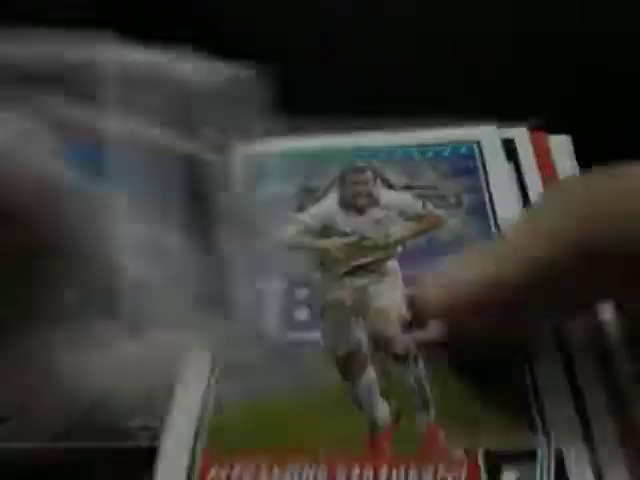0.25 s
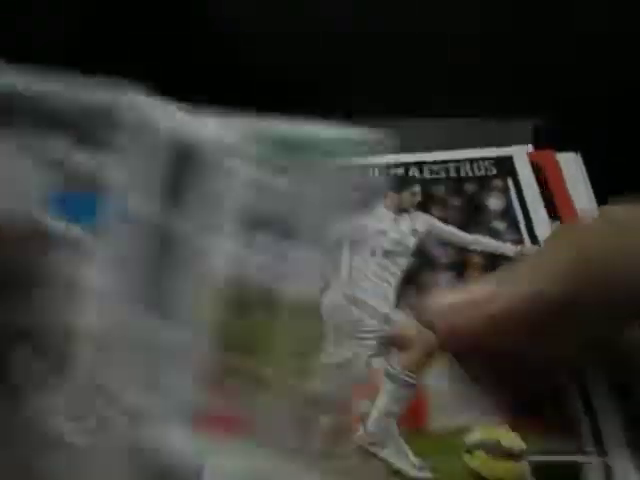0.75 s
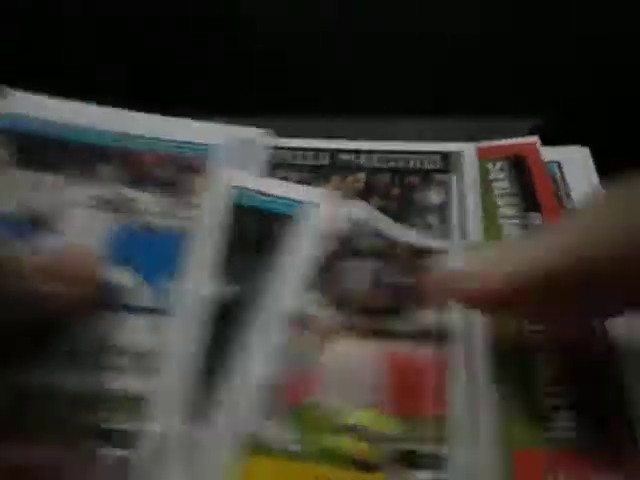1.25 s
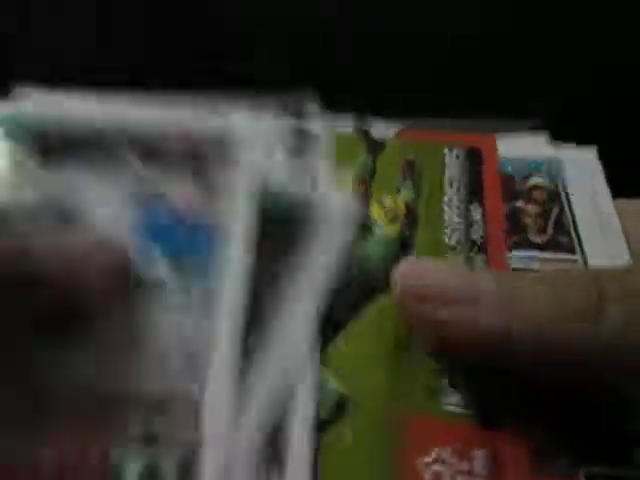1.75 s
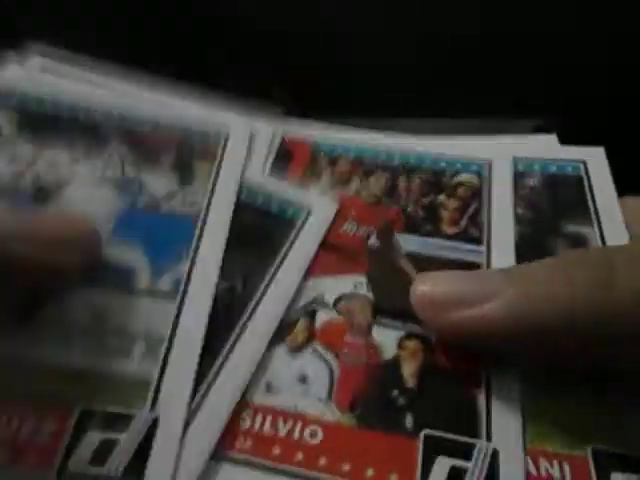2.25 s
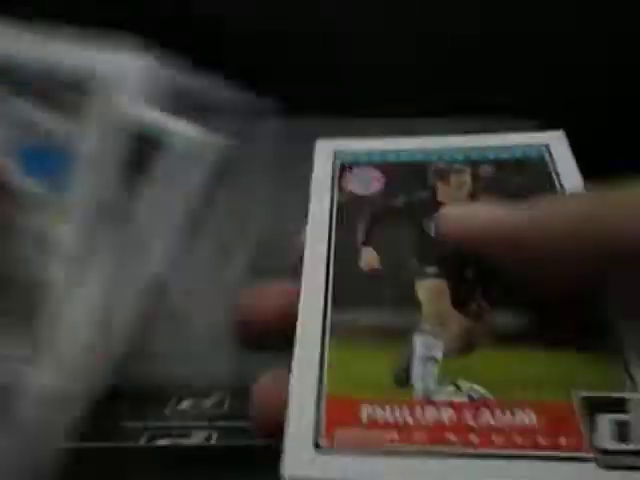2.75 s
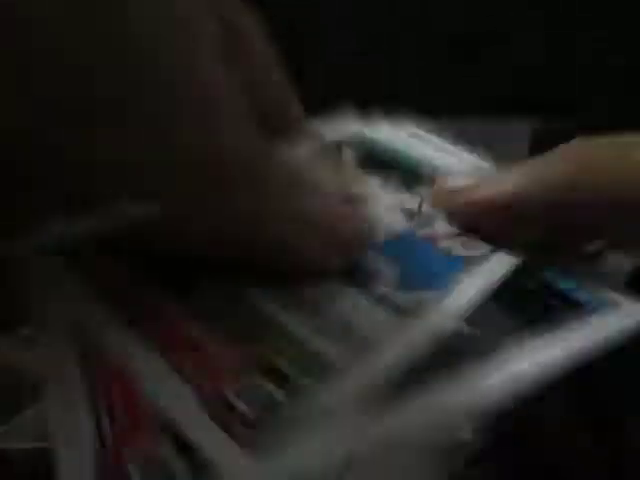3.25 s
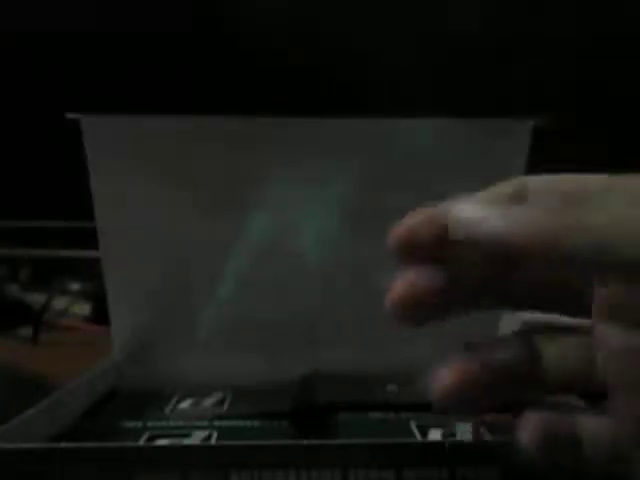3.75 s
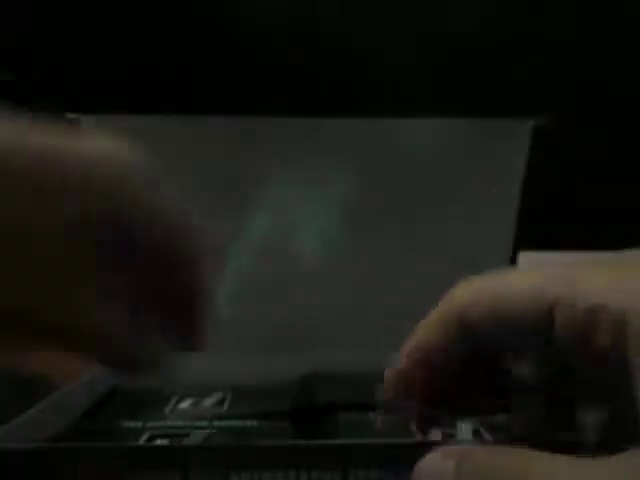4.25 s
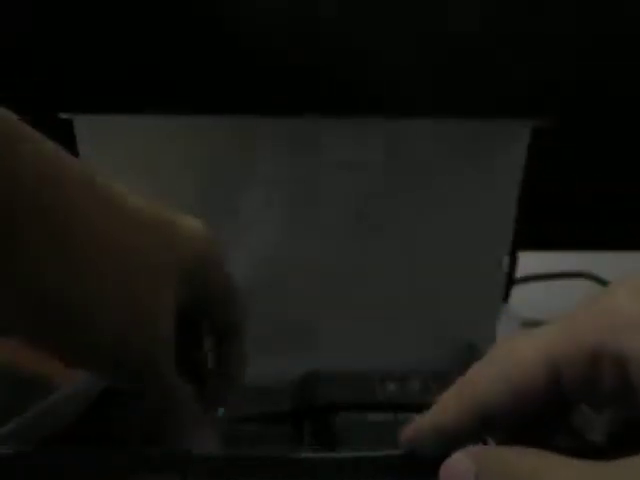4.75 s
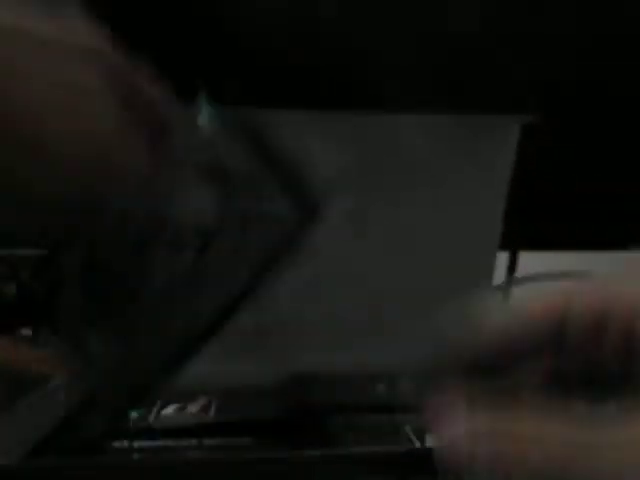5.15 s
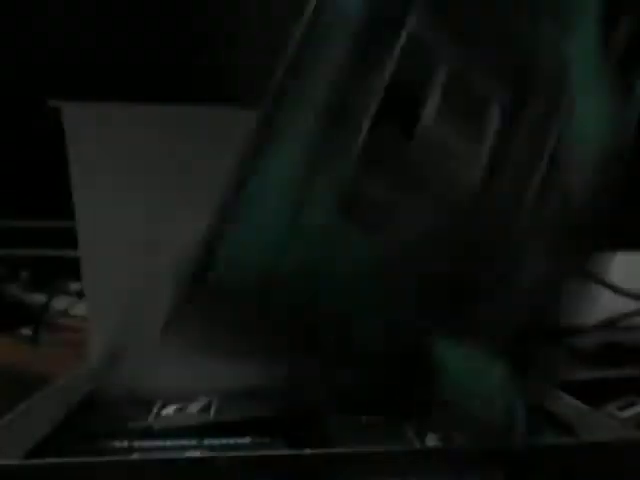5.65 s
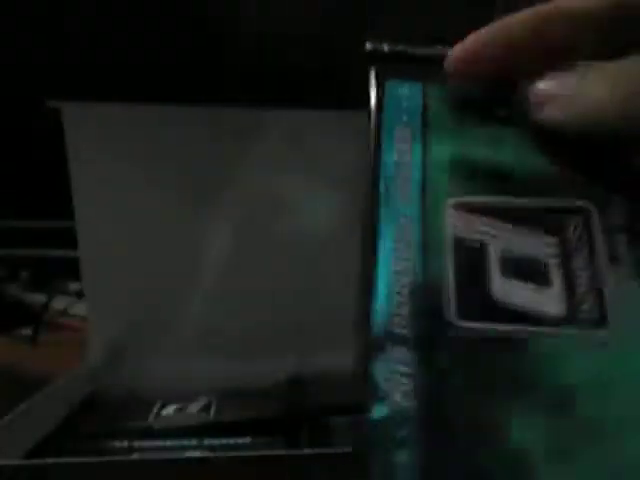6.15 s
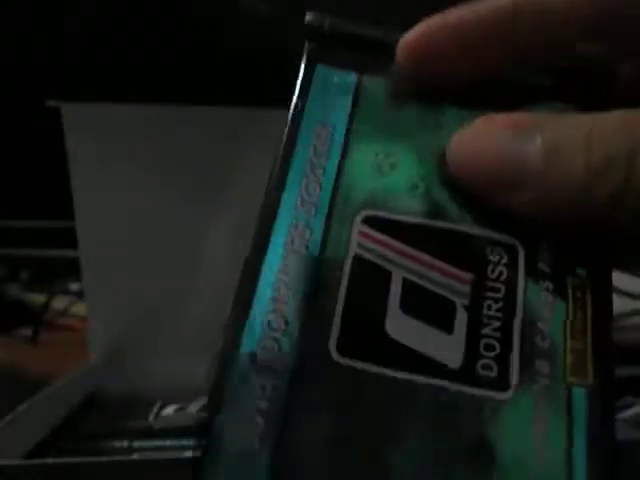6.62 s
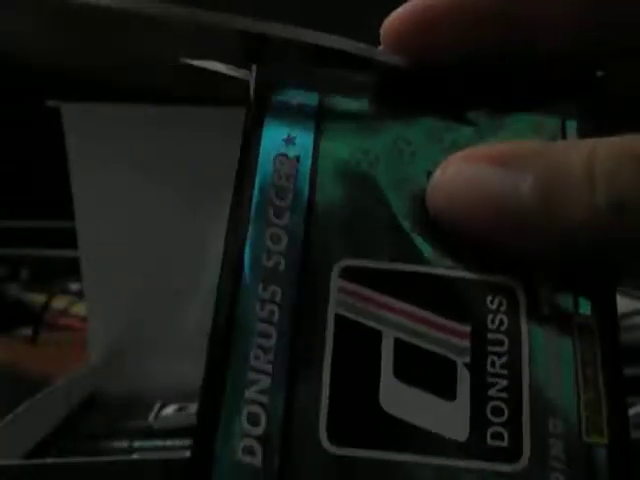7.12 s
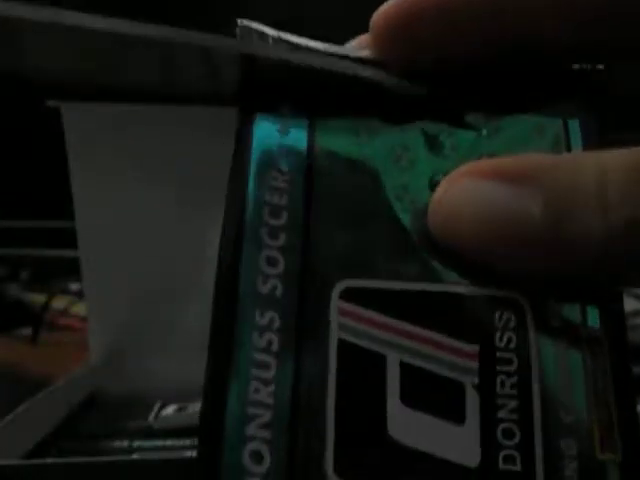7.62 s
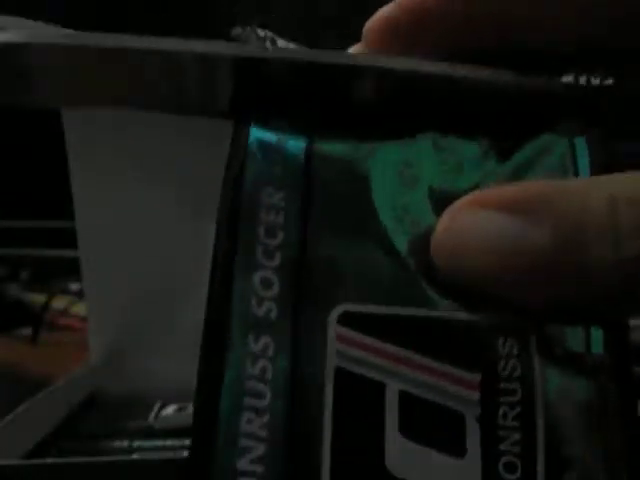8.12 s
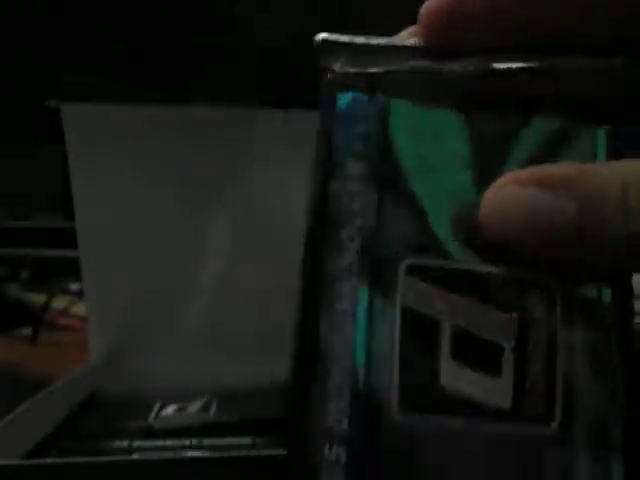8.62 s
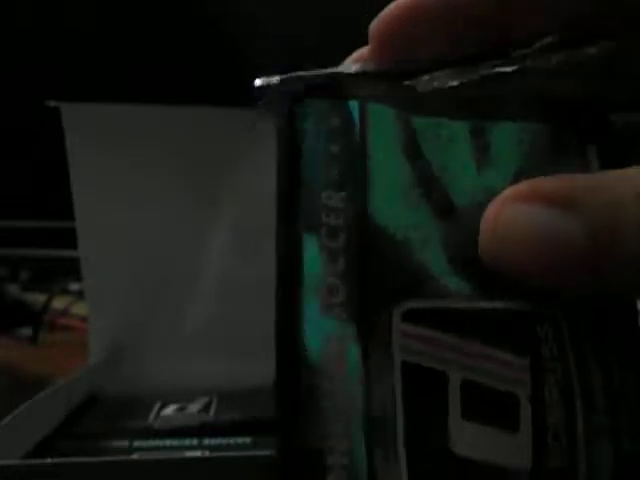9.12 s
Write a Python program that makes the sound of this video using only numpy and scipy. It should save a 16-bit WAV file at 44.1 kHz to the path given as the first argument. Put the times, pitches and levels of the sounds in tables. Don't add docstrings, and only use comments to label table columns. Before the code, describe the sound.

Paper cards slide and snap off a stack, then a foil pack is pulled from a cardboard box, crackled, cut open, and scissors clatter down.

```python
import sys
import numpy as np
from scipy import signal
from scipy.fft import rfft, irfft
from scipy.io import wavfile
from scipy.ndimage import uniform_filter1d

SR = 44100
rng = np.random.default_rng(int(sys.argv[2]) if len(sys.argv) > 2 else 0)


def to_wav(s):
    ch = np.atleast_2d(s).T
    pcm = np.round(np.clip(ch, -1, 1) * 32767)
    wavfile.write(sys.argv[1], SR, pcm.astype(np.int16))


def gain_from_decibels(decibels):
    exponent = np.asarray(decibels, float) / 20
    return 10 ** exponent


N = 413658
SUDDEN = 6000
AIR_DB, ROOM_DB = -56.5, -18
DROP_S, BLADES_DB = 9, -12.5
SQUEAL_HZ, SQUEAL_WIDTH, WOBBLE_HZ = 3900, 1900, 69

# frequency in Hz, level in dB.
AIR = [(15, -34), (25, -4.5), (229, -3.5), (363, -5), (502, -1.5), (693, -7), (1120, -10.5), (1450, -17),
       (2300, -9.5), (2830, -14.5), (6200, -24), (8060, -59), (13600, -120)]
# frequency in Hz, bandwidth in Hz, level in dB.
FAN = [(1119, 8.4, -71), (2383, 35, -68)]
# frequency in Hz, t60 in seconds.
ROOM = [(150, 0.73), (600, 0.36), (2000, 0.27), (8000, 0.39)]
# frequency in Hz, level in dB.
MIC = [(25, -10.5), (60, -9.5), (120, 1), (5800, 2), (6800, -2.5), (7700, -1.5), (9200, -1.5),
       (10800, -1.5), (11500, -12.5), (12300, -39), (13000, -70)]
# frequency in Hz, width in Hz.
NOTCHES = [(7000, 500), (8500, 600), (10000, 600), (12000, 500)]
# frequency in Hz, level in dB, t60 in seconds.
BOX = [(111.6, -11, 0.23), (248.2, 2.5, 0.15), (513, 2, 0.059), (657, 1.5, 0.039), (748, -3, 0.45),
       (1246, 1.5, 0.022), (1410, -19, 0.045), (1885, -0.5, 0.041), (2040, -5, 0.024), (2670, -3.5, 0.031),
       (3700, -3, 0.021)]
# time in seconds, pitch factor.
PRESS = [(5.26, 1.2), (5.9, 1.11), (5.97, 1.16), (6.03, 0.98), (6.14, 0.98), (6.2, 1), (9.08, 1.024),
         (9.11, 1.13), (9.15, 1.1), (9.2, 1.19), (9.26, 1.13)]
# frequency in Hz, level in dB.
DRAG = [(60, -43), (130, -3), (250, 7.5), (600, 12.5), (1200, 12.5), (2200, -5), (4000, -42)]
# peak time in seconds, peak in dB, rise and fall in dB per s.
PUSH = [
    (3.3, -56, .4, 3),
    (5.14, -35, 59, 145),
    (9.17, -29, 202, 160),
]
# peak time in seconds, peak in dB, rise and fall in dB per s.
SCRAPE = [(5.266, -41.5, 253, 500), (5.95, -44, 1200, 150), (6.03, -49.5, 400, 300), (6.1, -50, 895, 58),
          (6.168, -35, 700, 598), (9.02, -41, 4002, 47), (9.2, -30.5, 202, 199)]
# frequency in Hz, level in dB.
RATTLE = [(246, -8), (1295, -15), (2050, -12.5), (2830, -13.5), (3830, -15.5)]
# peak time in seconds, peak in dB, rise and fall in dB per s.
SING = [
    (6.105, -47.5, 700, 64),
    (6.165, -48, 103, 500),
    (9.041, -37, SUDDEN, 160),
    (9.2, -38.5, 102, 300),
]
# frequency in Hz, level in dB, t60 in seconds.
BLADES = [(1220, -6, .3), (2046, -5.5, 0.49), (2800, -5, 0.044), (3810, -6, 0.36)]
# time in seconds, peak in dB, treble in dB against the knock, t60 in seconds.
KNOCKS = [(1.938, -32.5, -19, 0.028), (3.272, -40.5, 2, 0.053), (4.014, -43, -18, 0.12),
          (4.488, -35, -21, 0.32), (5.263, -36, -9, 0.059), (5.29, -35.5, -25, 0.053),
          (5.615, -34, -30, 0.026), (5.926, -28, -1, 0.12), (5.938, -24, -20, 0.056),
          (9.016, -16, 4, 0.028), (9.042, -20.5, 0, 0.099), (9.109, -15.5, 5.5, 0.059),
          (9.162, -9.5, 0.5, 0.039)]
# start in seconds, peak in dB, pitch in Hz.
THUMPS = [(0.145, -43, 243), (.392, -22.5, 340), (0.72, -48, 89), (0.899, -44, 81), (1.455, -21.5, 576),
          (1.941, -44, 128), (2.05, -41.5, 200), (2.45, -20, 564), (3.3, -44.5, 105), (4.489, -38.5, 182),
          (5.29, -48, 69.5), (5.618, -32, 444), (5.663, -34, 434), (5.93, -40, 120)]
# peak time in seconds, pitch in Hz, peak in dB.
SQUEAK = (6.724, 2970, -20)
# multiple of its pitch, level in dB.
SQUEAK_PARTS = [(2, -0.5), (3.05, -20)]
# start in seconds, length in seconds, peak in
# dB, slip rate in Hz, wobble share.
SQUEALS = [(.86, 0.02, -43, 4080, .02), (.986, 0.029, -32.5, 1316, 0.069),
           (6.616, 0.0087, -27, 2600, 0.022), (6.62, 0.018, -40, 3160, .01),
           (6.667, 0.0095, -34.5, 3010, 0.033), (6.721, 0.0086, -42, 3100, 0.033)]
# frequency in Hz, level in dB.
HISS = [(400, -21), (1200, 0.5), (2500, 1.5), (4000, 2), (6000, 4.5), (9000, -5.5), (12000, 4)]
# time in seconds, brightest frequency in Hz.
BRIGHT = [(0, 4200), (1, 4000), (2, 3700), (2.5, 3630), (3.34, 3830), (3.6, 3830), (4.5, 3100),
          (5.65, 4480), (6.1, 2800), (6.3, 3700), (7.4, 3900), (8.3, 4170), (8.95, 4020), (9.02, 2590)]
# end in seconds, peak in dB, rise in dB per s.
SWELLS = [(.903, -34, 200), (2.015, -30.5, 299.5), (2.459, -29, 337), (2.841, -34.5, 207),
          (3.346, -37, 342), (4.995, -40.5, 200), (5.64, -45, 78), (5.892, -50.5, 111), (6.188, -50.5, 90),
          (7.79, -28.5, 252), (7.959, -31.5, 310), (8.401, -27, 1200)]
# start in seconds, peak in dB, fall in dB per s.
SETTLES = [(0.15, -41.5, 152), (.909, -42.5, 200), (1.457, -42, 143), (1.84, -33, 600), (2.342, -42.5, 260),
           (2.462, -49.5, 62), (5.29, -51, 123), (5.655, -39, 1100), (6.735, -54.5, 100),
           (6.977, -40.5, 303), (9.03, -41, 161), (9.11, -23, 700), (9.125, -39.5, 100),
           (9.225, -36.5, 155)]
# start in seconds, length in seconds, level in dB, sag in dB.
SLIDES = [(0.295, 0.088, -40.5, -1.5), (0.664, 0.077, -58.5, -6.5), (0.98, 0.037, -44, 7),
          (1.37, 0.1, -46, 0), (2.018, 0.058, -56.5, -11.5), (2.832, 0.069, -53.5, -3),
          (3.081, 0.13, -48.5, -5), (3.569, 0.048, -40, -1.5), (3.739, 0.013, -24, 16.5),
          (3.98, 0.053, -46.5, 12), (4.48, 0.074, -52, 4), (4.562, 0.056, -44, 1), (4.63, 0.021, -33, 5),
          (4.662, 0.16, -50, 7), (4.829, 0.032, -53, -5), (4.861, 0.098, -53.5, -7), (4.95, 0.043, -43, -8),
          (4.992, 0.035, -25, 1.5), (5.027, 0.089, -34, 9.5), (5.104, 0.092, -29.5, 5),
          (5.193, 0.11, -40, 9), (9.17, .053, -29.5, 4.5), (6.612, 0.042, -38, 8), (6.665, 0.014, -41, 1),
          (7.363, .19, -49, -0.5), (7.554, 0.1, -34.5, 6.5), (7.792, 0.08, -28, 12.5),
          (7.964, .1, -52.5, 3), (8.063, .24, -32, 15), (8.391, 0.2, -39, 0.5), (1.044, 0.0093, -42.5, 4),
          (5.542, 0.036, -41, 8), (5.594, 0.023, -36.5, -2), (5.654, 0.012, -33, 0), (5.454, .016, -43, -3),
          (5.631, .011, -38, -5), (8.347, 0.027, -51, -13), (8.375, 0.03, -29, -4), (6.32, .07, -56, 1),
          (6.546, 0.044, -51, -5), (7.653, .07, -58, 2), (7.999, 0.017, -44.5, 4)]
# time in seconds, peak in dB, pitch in Hz, body in dB against the snap.
CARD_SNAPS = [(.1444, -19.5, 3700, -2.5), (.3926, -10.5, 2810, -3.5), (.7119, -29, 2200, -6.5),
              (.7292, -33.5, 3420, 1), (.89, -16, 3640, -7), (1.203, -22, 2530, -20),
              (1.359, -36, 3700, -3), (1.4698, -15, 3920, -9.5), (1.4912, -25.5, 2930, -27),
              (1.8315, -24, 3120, -12), (1.8406, -19.5, 3400, -3.5), (2.0542, -21.5, 3600, -12.5),
              (2.7558, -25, 3450, -11.5), (2.8103, -25.5, 3680, -9), (2.8367, -25, 4330, -5.5),
              (3.0778, -29, 3560, -1), (3.1007, -12, 3970, -6.5), (3.1374, -23.5, 3170, -8),
              (3.3133, -30, 4750, -11), (3.4748, -28.5, 2880, -8), (3.514, -29.5, 3500, -10),
              (3.7309, -31.5, 3950, -4), (4.0092, -34.5, 2850, 8), (4.4898, -32, 2150, 13.5),
              (4.4943, -22.5, 3650, -15), (4.5715, -29.5, 3280, 4), (4.6107, -25, 3600, -5),
              (1.4578, -15.5, 1540, -5), (4.528, -33, 3200, -15), (4.5985, -36.5, 3000, 7),
              (4.726, -32.5, 4600, -30), (4.738, -34, 3590, -6), (4.795, -35, 3430, -11),
              (4.854, -39, 4530, -15)]
CARD_FLAPS = [(.9036, -23.5, 3770, -7), (1.0474, -34, 3700, -28), (1.2238, -24.5, 2040, 1),
              (1.4563, -10, 2340, -9), (2.0057, -18, 4430, -11), (2.0108, -21, 2930, -7.5),
              (2.3521, -19.5, 3420, -5), (2.451, -19.5, 3060, -2.5), (2.7159, -28.5, 3000, -1.5),
              (4.5828, -21, 1830, -7), (4.634, -17.5, 2090, -15), (4.69, -34, 3500, -6),
              (4.7841, -32, 3170, -14), (4.5665, -26.5, 4100, -8), (4.65, -31.5, 2500, 2),
              (4.838, -30, 2920, -13), (4.916, -35.5, 2200, 0.5)]
LIFT_SNAPS = [(4.9772, -24, 4030, 0), (4.9981, -17, 4110, -9), (5.0357, -31, 2860, 7),
              (5.0598, -25, 4270, -1), (5.0961, -16, 5730, -5.5), (5.1064, -31, 3170, 9.5),
              (5.121, -10.5, 4840, -11.5), (5.1862, -10.5, 6000, -8.5), (5.2165, -26, 3740, -1),
              (5.2638, -23.5, 2690, 3), (4.941, -37, 1700, -7), (5.1407, -22.5, 4340, -1.5)]
FOIL_SNAPS = [(5.3792, -16, 3450, -20.5), (5.443, -25.5, 3180, -14), (5.467, -25.5, 2460, -7.5),
              (5.488, -18, 3800, -31), (5.5149, -4.5, 4070, -20), (5.5867, -14, 5230, -35),
              (5.6407, -7, 5570, -23), (5.6627, -17, 5010, -19), (5.7725, -30, 2760, -30),
              (5.8847, -23.5, 4540, -24), (5.9277, -20.5, 4000, -6), (5.976, -23, 4000, -21),
              (6.018, -21.5, 3660, -16), (6.2401, -12.5, 3320, -35), (6.262, -16, 3700, -37),
              (6.286, -24, 4000, -34), (6.3127, -5, 3740, -53), (6.3518, -17.5, 3900, -47),
              (6.4225, -29, 3830, -45), (6.496, -30.5, 3150, -19), (6.564, -21, 3360, -20),
              (7.034, -25.5, 5700, -14), (7.0905, -12.5, 4500, -39), (7.137, -31, 2750, -10),
              (5.454, -32, 4500, -21), (5.505, -30, 2960, -22), (5.508, -21, 4500, -30),
              (5.572, -35, 3740, -25), (6.308, -30, 4000, -30), (6.593, -21, 3820, -23),
              (6.685, -31.5, 2800, -22), (9.015, -24.5, 10900, -40), (9.162, -17, 10900, -40)]
CUT_SNAPS = [(7.4323, -19, 2480, -40), (7.4682, -20, 4100, -14), (7.5054, -11, 3480, -41),
             (7.5247, -24, 2620, -14), (7.545, -19.5, 5000, -15), (7.5588, -24, 3810, -40),
             (7.6001, -13.5, 5940, -19), (7.6218, -18.5, 2690, -15), (7.6882, -20, 4640, -24),
             (7.7348, -23, 4100, -37), (7.75, -19.5, 1750, -8), (7.7782, -12.5, 3900, -39),
             (7.7908, -14, 4340, -41), (7.8119, -15.5, 2860, -39), (7.8332, -22, 4860, -28),
             (7.9536, -10, 4800, -22), (8.0672, -23, 3030, -29), (8.1308, -6, 4270, -24),
             (8.3707, -28.5, 4360, -6), (8.3962, -15, 3380, -29), (8.4274, -12, 3930, -14.5),
             (8.4766, -26, 3360, -17), (8.5243, -23, 3560, -6.5), (7.3588, -39, 2900, -20),
             (7.585, -27, 2990, -7), (7.7207, -44, 4020, -25), (7.862, -27, 2950, -25),
             (8.01, -29, 5430, -27), (8.0591, -28, 4410, -27), (8.2146, -37, 4380, -20),
             (8.358, -41, 3580, -25), (8.484, -12.5, 3640, -19.5), (8.531, -29.5, 3020, 0),
             (7.547, -22, 3500, -18), (7.562, -25, 5040, -23), (7.58, -36, 4500, -22),
             (7.63, -31, 4500, -15), (7.711, -46, 4500, -25), (7.743, -27, 3500, -25),
             (7.76, -23, 3500, -25), (7.7868, -17, 4530, -30), (7.808, -32, 3500, -25),
             (7.826, -34, 4500, -25), (7.841, -26, 5000, -25), (7.932, -40, 4000, -20),
             (7.9034, -14, 3860, -18.5), (8.1587, -9, 4400, -19.5), (8.0793, -24.5, 3620, -18),
             (7.6913, -17, 3620, -31)]
CRUNCHES = [(5.002, -20.5, 4000, 2.5), (5.616, -19, 5450, -27), (5.6574, -13, 5200, -17),
            (5.7952, -17.5, 3330, -11.5), (5.831, -24.5, 5000, -35), (6.5198, -22.5, 4000, -26),
            (6.594, -14.5, 3680, -14), (6.62, -36, 2770, -23), (6.6707, -33, 3660, -19),
            (7.274, -22.5, 3040, -9), (7.6168, -23, 3000, -8), (7.6925, -20.5, 3400, -20),
            (7.905, -14, 3900, -13.5), (8.0789, -25, 3480, -25), (8.1594, -21, 4160, -14),
            (8.2362, -32.5, 2000, -9), (8.3995, -8.5, 3700, -14), (8.4311, -18, 2840, -23),
            (8.447, -10, 3950, -34), (8.481, -8.5, 4750, -19), (8.7245, -35, 3160, -6),
            (4.962, -30, 1930, -9), (4.99, -24.5, 3540, 3), (5.014, -26, 3040, 10), (5.022, -25, 3020, 8.5),
            (5.228, -24, 3500, -2), (5.548, -25, 3680, -14), (5.879, -30, 3050, -10),
            (8.296, -42, 3000, -20), (7.918, -29, 4000, -9), (8.08, -21.5, 1770, -24)]
TICKS = [(3.688, -40, 3500, -20), (4.018, -38.5, 2500, 5.5), (4.997, -18.5, 1700, 0),
         (5.972, -33, 3500, -20), (6.023, -32, 4540, -20), (6.678, -33, 3200, -20), (.236, -38, 3800, -9),
         (6.036, -33, 10500, -20)]


def evened(x):
    return x / np.sqrt(np.mean(x ** 2) + 1e-20)


def peaked(x):
    return x / abs(x).max()


def read(points, hz):
    f, value = np.transpose(points)
    return np.interp(np.log(hz + 1), np.log(f + 1), value)


def follow(points, t):
    return np.interp(t, *np.transpose(points))


def colour(x, points):
    return irfft(rfft(x) * gain_from_decibels(read(points, np.fft.rfftfreq(N, 1 / SR))), N)


def resonate(x, hz, width):
    turn = np.exp(2j * np.pi * np.cumsum(hz * np.ones(len(x))) / SR)
    r = np.exp(-np.pi * width / SR)
    return 2 * (turn * signal.lfilter([1 - r], [1, -r], x / turn)).real


def highpass(x, hz):
    return signal.sosfilt(signal.butter(2, hz, "high", fs=SR, output="sos"), x)


def noise():
    return rng.standard_normal(N)


def wander(size):
    return evened(uniform_filter1d(uniform_filter1d(noise(), size), size))


def add(mix, s, sound):
    part = mix[round(s * SR):][:len(sound)]
    part += sound[:len(part)]


def surges(rows, rest_db, size=16):
    t = np.arange(0, N, size) / SR
    s, db, rise, fall = np.transpose(rows)[..., None]
    slope = np.where(t < s, rise, fall)
    level = (db - abs(slope * (t - s))).max(0)
    return np.repeat(np.maximum(level, rest_db), size)[:N]


def air():
    base = gain_from_decibels(AIR_DB + 0.32 * wander(size=3000)) * evened(colour(noise(), AIR))
    for hz, width, db in FAN:
        whistle = evened(resonate(noise(), hz, width))
        base = base + gain_from_decibels(db + 0.5 * wander(size=4000)) * whistle
    return base


def room(x):
    taps = np.zeros(SR // 2)
    at = np.arange(200, len(taps) - 20, 20)
    taps[at + rng.integers(0, 20, len(at))] = rng.choice([-1., 1.], len(at))
    hz, t, z = signal.stft(taps, SR, nperseg=256)
    decay = gain_from_decibels(-60 * t / read(ROOM, hz)[:, None])
    tail = signal.istft(z * decay, SR, nperseg=256)[1]
    return gain_from_decibels(ROOM_DB) * signal.fftconvolve(x, tail / np.linalg.norm(tail))[:N]


def box(x, press, longest):
    ring = 0
    for hz, db, t60 in BOX:
        width = 2.74 / np.clip(t60, .01, longest)
        ring = ring + gain_from_decibels(db) * evened(resonate(x, hz * press, width))
    return resonate(ring, 1040, 4000)


def drag():
    dull = evened(colour(noise() * gain_from_decibels(2.4 * wander(size=400)), DRAG))
    hum = evened(box(noise(), follow(PRESS, np.arange(N) / SR), longest=0.21))
    sing = sum(gain_from_decibels(db) * evened(resonate(noise(), hz, 23)) for hz, db in RATTLE)
    out = dull * gain_from_decibels(surges(PUSH, rest_db=-65) - 5.5)
    out = out + hum * gain_from_decibels(surges(SCRAPE, rest_db=-68))
    return out + sing * gain_from_decibels(surges(SING, rest_db=-90))


def knocks():
    out, t = np.zeros(N), np.arange(8000) / SR
    for s, db, crack_db, t60 in KNOCKS:
        a, b = rng.standard_normal((2, len(t)))
        blow = a * gain_from_decibels(-60 * t / max(t60, .005))
        ring = box(blow, follow(PRESS, s), longest=0.17)
        ring = ring + 1.5 * evened(resonate(blow, 1220, 810))
        crack = resonate(b * gain_from_decibels(-60 * t / max(0.11 * t60, .005)), 3900, 1450)
        crack = resonate(crack, 1400, 2200)
        if s > DROP_S:
            blades = 0
            for hz, mode_db, mode_t60 in BLADES:
                width = 1.0 / np.clip(mode_t60, .05, .16)
                blades = blades + gain_from_decibels(mode_db) * evened(resonate(blow, hz, width))
            ring = peaked(ring) + gain_from_decibels(BLADES_DB) * peaked(blades)
        add(out, s - .0005, gain_from_decibels(db) * (peaked(ring) + gain_from_decibels(crack_db) * peaked(crack)))
    return out


def thumps():
    out, t = np.zeros(N), np.arange(3000) / SR
    for s, db, hz in THUMPS:
        cycles = t * hz
        push = np.sin(2 * np.pi * cycles) * cycles * np.exp(-cycles / 0.58)
        add(out, s, gain_from_decibels(db) * peaked(push))
    return out


def squeak():
    s, hz, db = SQUEAK
    t = np.arange(-.012, .25, 1 / SR)
    swell = np.where(t < 0, np.exp(t / 0.0026), np.exp(-t / 0.0018))
    tone = sum(gain_from_decibels(part_db) * np.sin(2 * np.pi * k * hz * t) for k, part_db in SQUEAK_PARTS)
    blades = 0.63 * evened(resonate(rng.standard_normal(len(t)), 2 * hz, 110))
    blades += np.sin(2 * np.pi * 5950 * t) + 0.62 * np.sin(2 * np.pi * 6010 * t)
    blades *= (t > 0) * gain_from_decibels(-27 - 60 * t / 0.3)
    out = np.zeros(N)
    add(out, s - .012, gain_from_decibels(db) * (swell * tone + blades))
    return out


def squeals():
    out = np.zeros(N)
    for s, length, db, hz, wobble in SQUEALS:
        t = np.arange(0, min(length, .04), 1 / SR)
        jitter = uniform_filter1d(rng.standard_normal(2000), size=40)[:len(t)]
        rate = hz * (1 - wobble * np.cos(2 * np.pi * WOBBLE_HZ * t) + 0.22 * jitter)
        turns = np.cumsum(rate) / SR
        slips = sum(np.cos(2 * np.pi * k * turns) for k in range(1, int(11000 / hz) + 1))
        tone = resonate(slips, SQUEAL_HZ, SQUEAL_WIDTH)
        tone = resonate(tone, SQUEAL_HZ, SQUEAL_WIDTH) + 0.22 * slips
        add(out, s, gain_from_decibels(db) * peaked(tone * np.sin(np.pi * t / length) ** 0.88))
    return out


def strokes():
    rows = [(s, db, rise, SUDDEN) for s, db, rise in SWELLS]
    rows += [(s, db, SUDDEN, fall) for s, db, fall in SETTLES]
    out = surges(rows, rest_db=-64)
    for start, length, db, sag_db in SLIDES:
        part = slice(round(start * SR), round((start + length) * SR))
        out[part] = np.maximum(out[part], np.linspace(db, db - sag_db, len(out[part])))
    return out


def rub():
    t = np.arange(N) / SR
    pack = t > 4.82
    foil = pack & (t < 8.9)
    level = gain_from_decibels(strokes())
    level = np.where(pack, uniform_filter1d(level, 120), uniform_filter1d(level, 650))
    slips = gain_from_decibels(np.minimum(rng.exponential(1, N), 3)) * (rng.random(N) < 2200 / SR)
    grain = np.where(foil, 1.2, .25) * evened(slips * noise()) + noise()
    wide = colour(grain * gain_from_decibels(np.where(foil, 2.6, 1.5) * wander(size=160)), HISS)
    bright_hz = follow(BRIGHT, t)
    bend = np.where(foil, .25, .12) * np.clip(wander(size=300), -3, 3)
    bent_hz = bright_hz * (1 + bend)
    open_edge = (bright_hz / 3600) ** 5.8
    hiss = open_edge * wide + 2.33 * resonate(resonate(wide, bent_hz, 1870), bent_hz, 1800)
    return hiss / np.sqrt(uniform_filter1d(hiss ** 2, 6000)) * level


def snaps(rows, ring, low_hz, sharpness, body_hz, body_t60, tail_db, fizz):
    out, t = np.zeros(N), np.arange(2600) / SR - .003
    after = np.maximum(t, 0)
    single = ring < .006
    tick = 0.74 * single * np.cos(2 * np.pi * 10400 * t) * np.exp(-(t / .00007) ** 2)
    width = np.where(t < 0, .045, .05) * max(ring, .003)
    envelope = gain_from_decibels(-np.minimum((t / width) ** 2, 200))
    flutter = (t > 0) * gain_from_decibels(tail_db - 60 * after / 0.017)
    onset = (t < 0) * gain_from_decibels(-15.5 - 60 * abs(t) / 0.0056)
    slap_envelope = np.clip((t + 0.0012) / 0.0014, 0, 1) * gain_from_decibels(-60 * after / body_t60)
    for s, db, hz, body_db in rows:
        a, b = rng.standard_normal((2, len(t)))
        crisp = single * np.cos(2 * np.pi * hz * t)
        burst = 0.64 * crisp * envelope + a * (0.83 * envelope + flutter + onset)
        bright = resonate(resonate(burst, hz, hz / sharpness), hz, hz / sharpness)
        bright = highpass(bright, 0.46 * hz)
        edge = 0.63 * peaked(np.diff(burst, n=2, prepend=[0, 0])) + tick
        bright = peaked(bright + fizz * (hz / 3800) ** .5 * abs(bright).max() * edge)
        slap = resonate(b * slap_envelope, body_hz, 1.09 * body_hz)
        add(out, s - .003, gain_from_decibels(db) * (bright + gain_from_decibels(body_db) * peaked(slap)))
    return highpass(out, low_hz)


def scene():
    card = dict(sharpness=1.0, body_hz=522, body_t60=0.024, tail_db=-7.5, fizz=0.45, low_hz=30)
    foil = dict(sharpness=0.89, body_hz=760, body_t60=0.018, tail_db=-13.0, fizz=0.66, low_hz=120)
    far = air() + drag()
    near = knocks() + thumps() + squeak() + squeals() + rub()
    cards = snaps(CARD_SNAPS, ring=0.0031, **card) + snaps(CARD_FLAPS, ring=0.01, **card)
    pack = snaps(LIFT_SNAPS + FOIL_SNAPS + CUT_SNAPS, ring=0.0033, **foil)
    pack = pack + snaps(CRUNCHES, ring=0.0071, **foil) + snaps(TICKS, ring=0.0035, **foil)
    near = near + cards + pack
    return (near + room(near) + far)[None]


def low_pass(x):
    return signal.sosfilt(signal.butter(12, 12800, fs=SR, output="sos"), x)


def record(dry):
    hz = np.linspace(0, SR / 2, 2049)
    gain = gain_from_decibels(read(MIC, hz))
    for zero_hz, width in NOTCHES:
        gain = gain * np.tanh(abs(hz - zero_hz) / width)
    taps = np.roll(irfft(gain), 2048) * np.hanning(4096)
    return low_pass(signal.oaconvolve(dry, taps[None], "same"))


dry = scene()
out = record(dry)
to_wav(out)
```